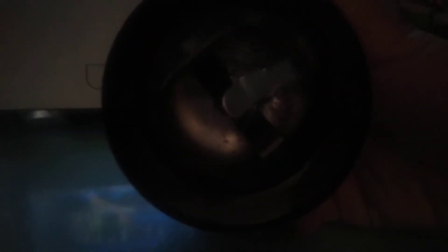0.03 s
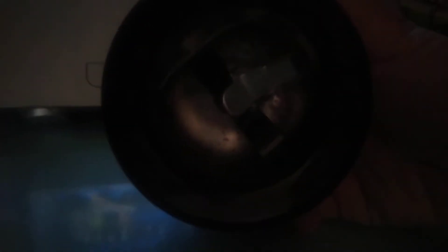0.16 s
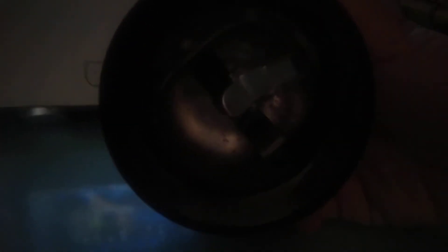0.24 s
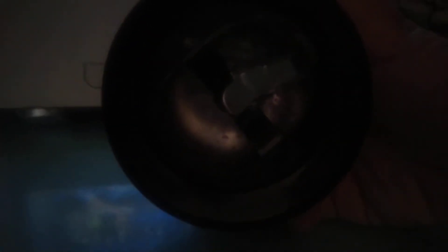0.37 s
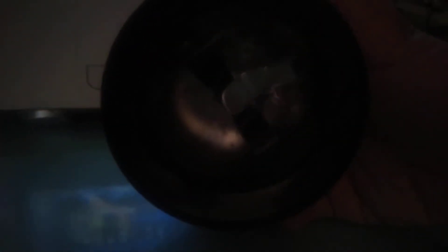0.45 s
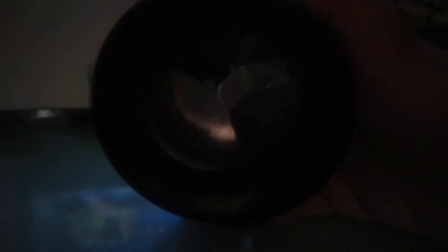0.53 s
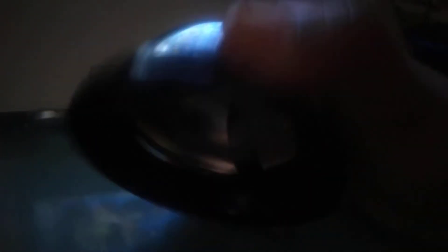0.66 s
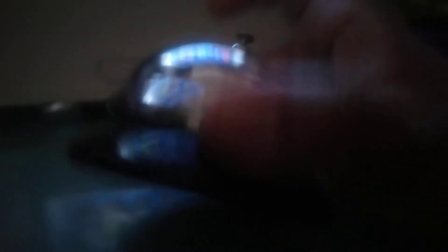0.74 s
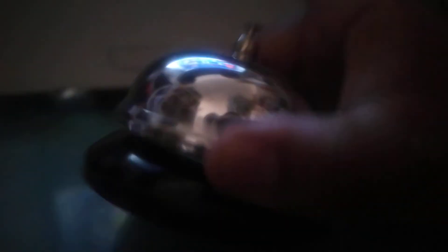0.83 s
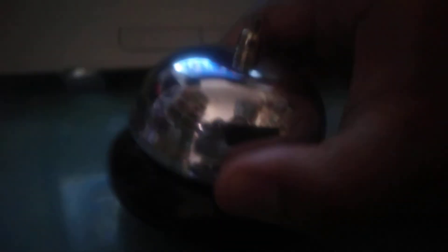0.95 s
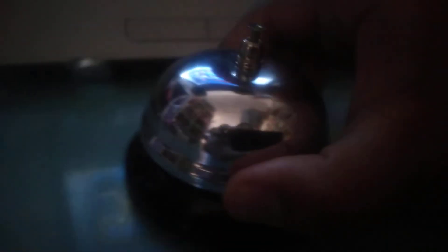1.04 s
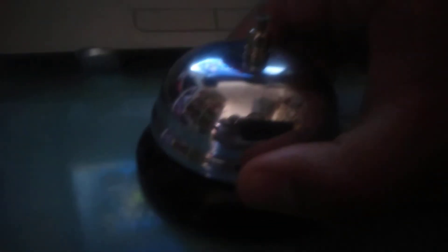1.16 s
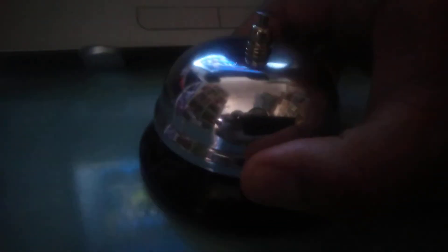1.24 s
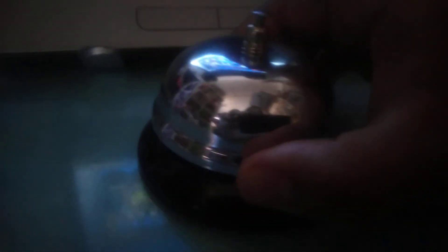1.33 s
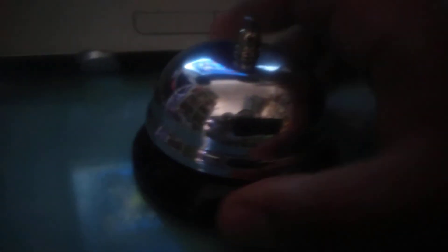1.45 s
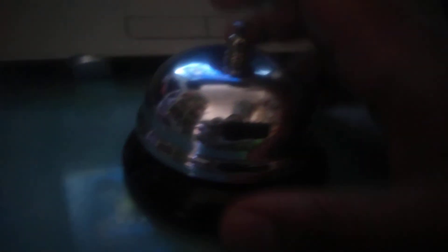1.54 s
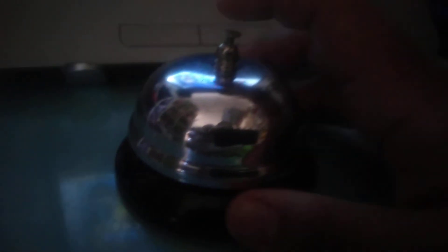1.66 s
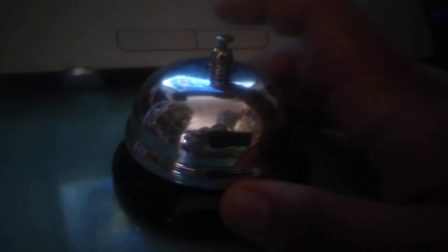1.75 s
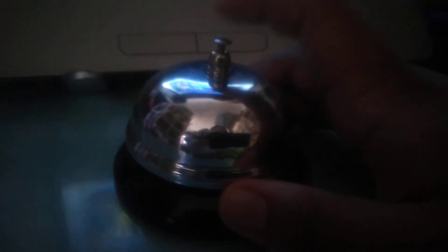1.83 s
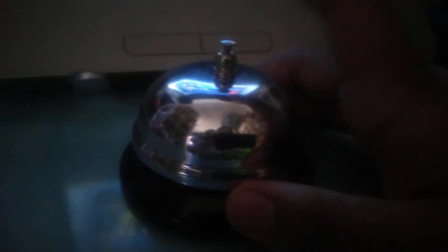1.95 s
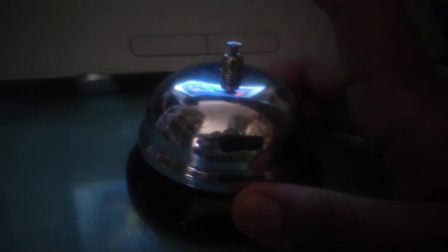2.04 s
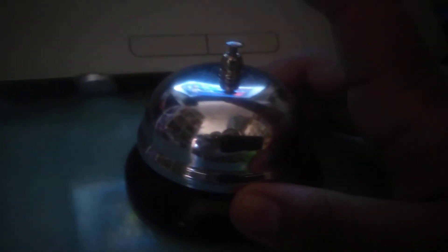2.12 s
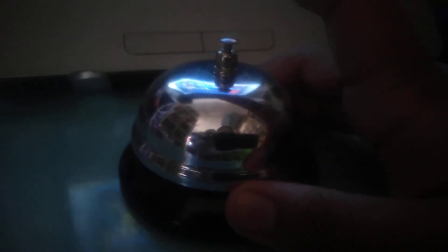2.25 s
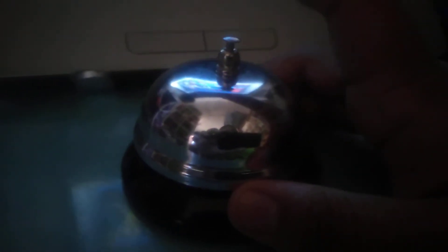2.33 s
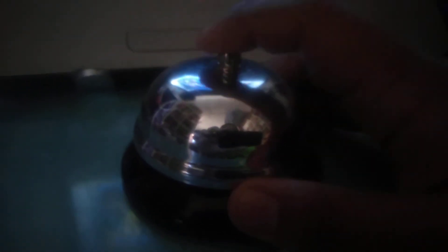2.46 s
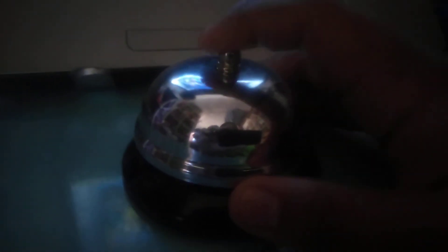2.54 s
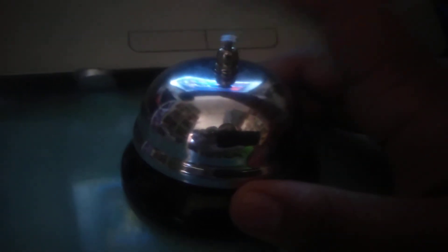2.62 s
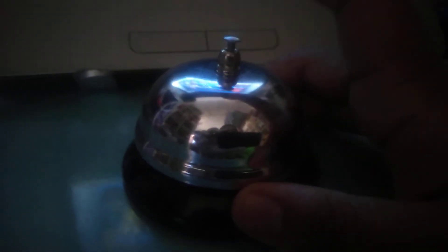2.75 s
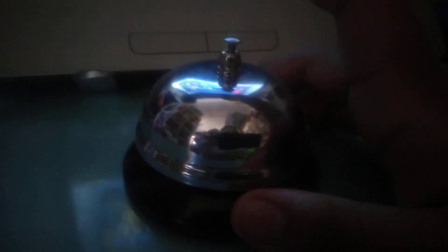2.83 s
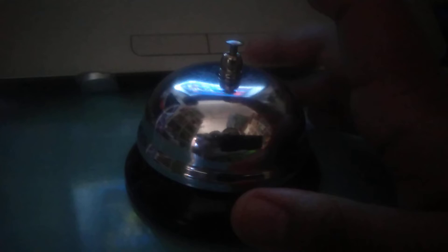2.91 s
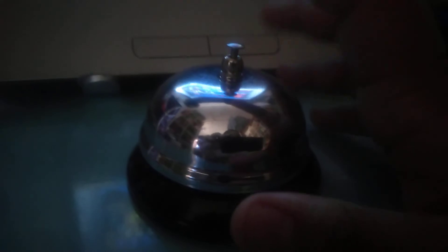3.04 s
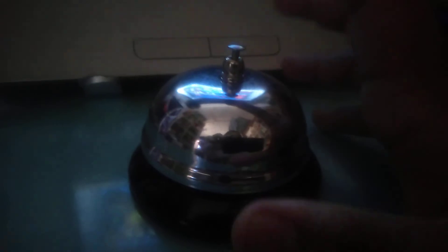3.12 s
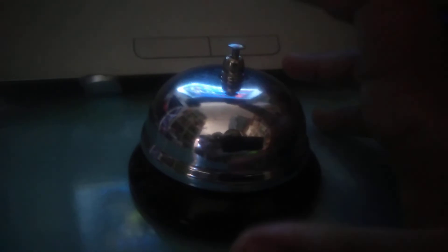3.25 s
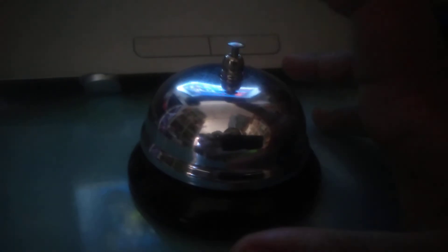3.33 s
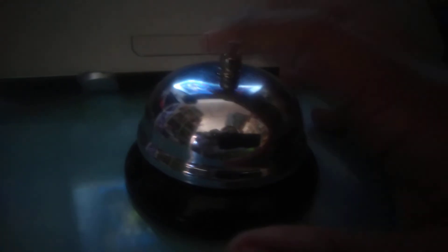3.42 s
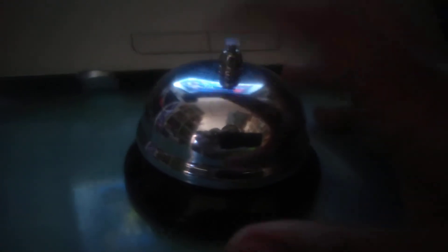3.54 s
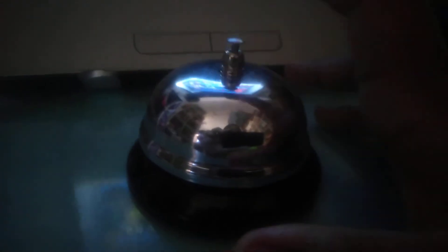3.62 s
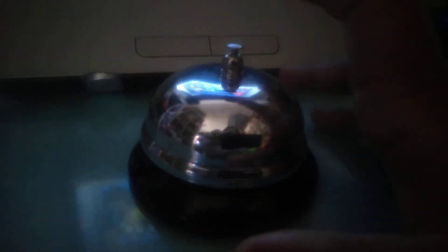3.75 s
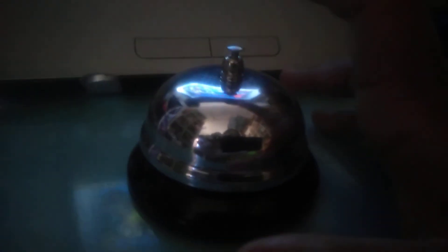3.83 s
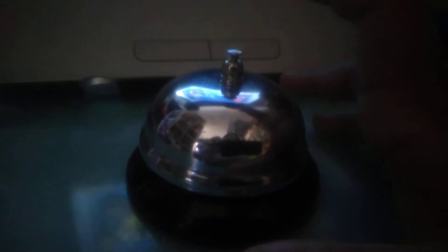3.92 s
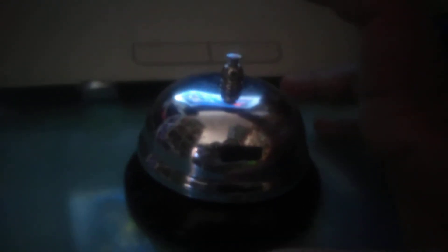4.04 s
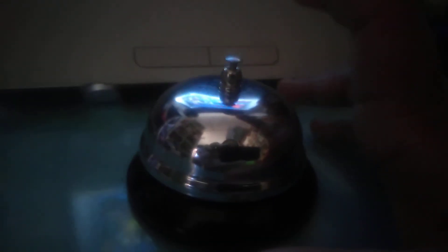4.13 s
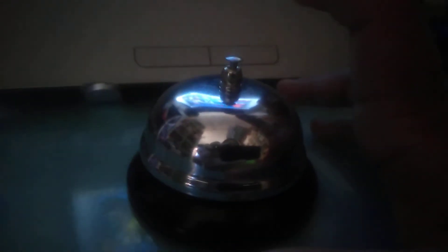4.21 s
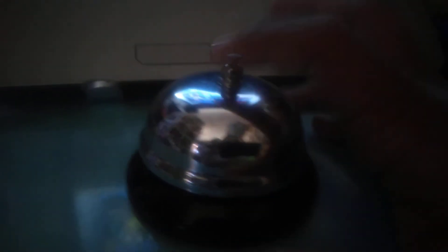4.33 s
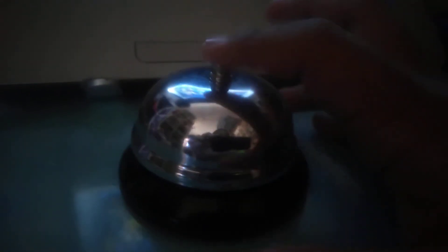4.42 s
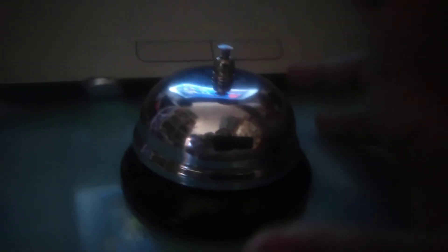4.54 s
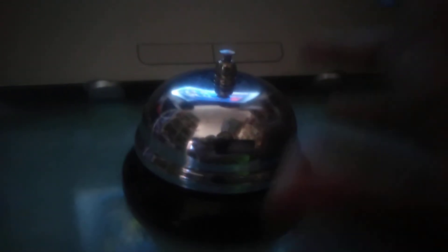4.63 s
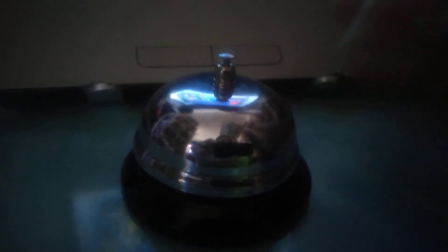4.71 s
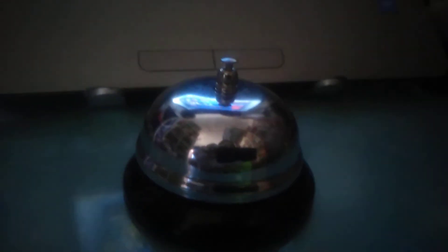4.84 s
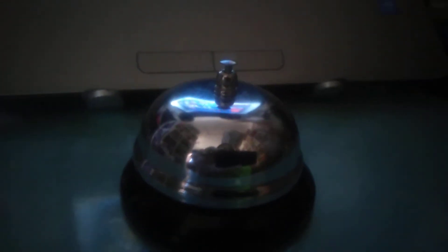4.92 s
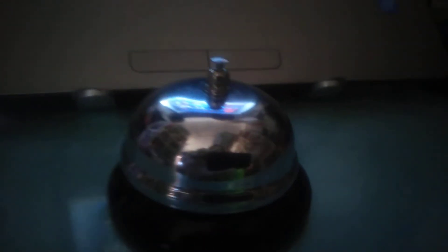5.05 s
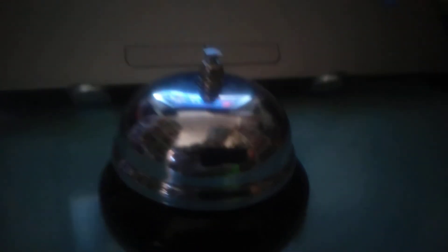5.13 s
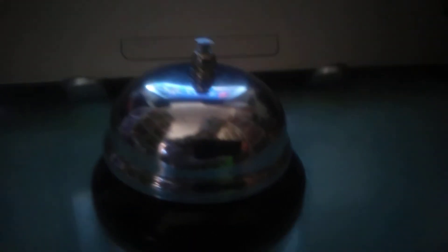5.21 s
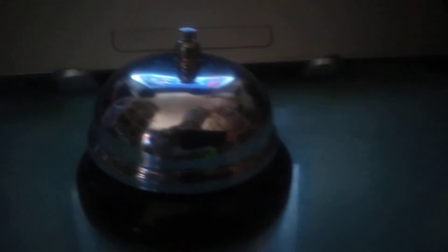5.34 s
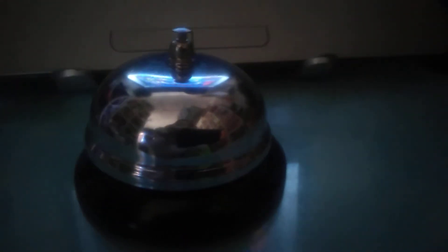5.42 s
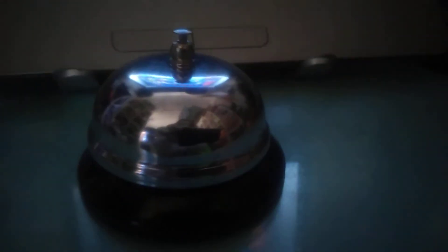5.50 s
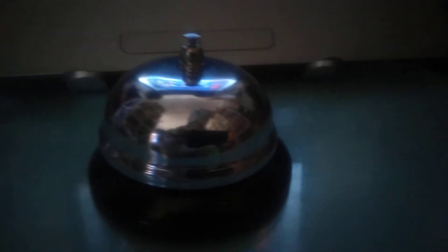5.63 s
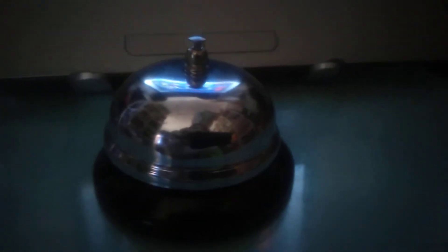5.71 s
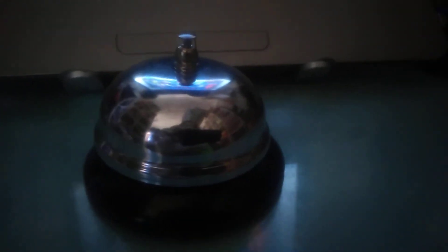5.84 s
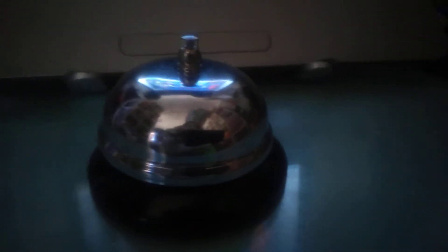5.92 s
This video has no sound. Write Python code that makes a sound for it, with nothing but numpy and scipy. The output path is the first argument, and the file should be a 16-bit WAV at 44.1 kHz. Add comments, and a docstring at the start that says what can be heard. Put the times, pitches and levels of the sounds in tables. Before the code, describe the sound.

Loose metal rattles and a soft knock on a table, then a muted bell clink and two bright, ringing counter-bell dings.

```python
"""A table top beside a humming computer: a steel desk bell is turned over in the hand, rattling, and set down.
It is struck three times: once choked by the finger, then twice ringing freely with slow beats.
The dome is a sum of paired decaying sines; rattles, clicks, knocks and thumps are noise cracks plus short modes.
Hum and fan are steady tones, rumble and hiss are shaped noise.
The close camera turns its gain down at loud peaks and lets it swell back."""
import sys
import numpy as np
from scipy import signal
from scipy.fft import rfft, irfft, next_fast_len
from scipy.io import wavfile
from scipy.ndimage import map_coordinates

SR = 44100
rng = np.random.default_rng(int(sys.argv[2]) if len(sys.argv) > 2 else 0)


def dump(signal):
    """Clip the signal to [-1, 1] and save it as 16-bit WAV at the path in sys.argv[1]."""
    limited = np.clip(np.atleast_2d(signal).T, -1, 1)
    pcm = np.round(limited * 32767).astype(np.int16)
    wavfile.write(sys.argv[1], SR, pcm)


N = 263277


def amp(db):
    """Decibels to gain."""
    return 10 ** (np.asarray(db) / 20)


def unit(x):
    """Scaled to rms 1."""
    return x / np.sqrt(np.mean(x ** 2) + 1e-20)


def wobble(rate_hz):
    """Smooth random curve, rate_hz knots a second."""
    knots = rng.standard_normal(int(N * rate_hz / SR) + 4)
    return map_coordinates(knots, [np.arange(N) * rate_hz / SR])


def filtered(x, gain):
    """x times a gain that depends on frequency."""
    size = next_fast_len(len(x) + 8192)
    return irfft(rfft(x, size) * gain(np.fft.rfftfreq(size, 1 / SR)), size)[:len(x)]


def noise(spectrum, size):
    """Noise of rms 1 coloured by (pitch_hz, level_db) points."""
    hz, db = np.transpose(spectrum)
    colour = lambda f: amp(np.interp(np.log(f + 1), np.log(hz), db))
    return unit(filtered(rng.standard_normal(size), colour))


def add(track, start_s, sound):
    """Mix a sound into the track at start_s."""
    start = round(start_s * SR)
    track[start:start + len(sound)] += sound[:N - start]


# mains hum: time_s, level_db
HUM = [(0.1, -62), (2.18, -46), (2.72, -66), (4.75, -67), (5.9, -66.5)]
# computer fan tones, relative: pitch_hz, level_db
FAN_TONES = [(102.3, -71.5), (177.6, -69.5), (204.6, -66), (231.5, -64), (376.8, -67), (538.3, -72)]
# hiss spectrum, relative: pitch_hz, density_db_per_hz
HISS_SPECTRUM = [(40, -21), (150, -26), (300, -26.5), (400, -24.5), (600, -29.5), (1130, -28), (1500, -32),
                 (3000, -37.5), (5300, -43.5), (6600, -36), (8500, -49.5), (12000, -50), (15700, -38)]
# level at the mean hum; share of the hum's dB swell followed
FAN_DB, FAN_FOLLOWS = -63.5, 0.21
HISS_DB, HISS_FOLLOWS = -57, 0.052


def background(mains_hz=51, rumble_db=-53):
    """Hum sine, wavering fan sines, low rumble noise and hiss; fan and hiss swell with the hum."""
    t = np.arange(N) / SR
    hum_s, hum_points_db = np.transpose(HUM)
    hum_db = np.interp(t, hum_s, hum_points_db)
    swell_db = hum_db - hum_db.mean()
    hum = amp(hum_db) * unit(np.sin(2 * np.pi * mains_hz * t))
    fan = unit(sum(amp(db + 2.9 * wobble(5.13)) * np.sin(2 * np.pi * hz * t + 0.7 * wobble(9))
                   for hz, db in FAN_TONES))
    fan *= amp(FAN_DB + FAN_FOLLOWS * swell_db)
    hiss = amp(HISS_DB + HISS_FOLLOWS * swell_db) * noise(HISS_SPECTRUM, N)
    rumble_band = [(8, -16.0), (21, -6), (25, 5.0), (30, -21), (65, -12.5), (90, -42.5), (200, -69.0)]
    return hum + fan + hiss + amp(rumble_db) * noise(rumble_band, N)


def contact(modes, spectrum, tilt_db_per_oct, ring_db, ring_life, crack_t60_s, echo_db, echo_t60_s,
            rise_s=0.00038):
    """One hit: short crack, body modes at chance strengths, scatter from nearby surfaces; first 4 ms at rms 1."""
    t = np.arange(SR // 4) / SR
    head = slice(SR // 250)
    tilt_db = lambda hz: tilt_db_per_oct * np.log2(hz / 1000)
    ring = np.zeros(len(t))
    for hz, width_hz, db in modes:
        strength = width_hz * amp(db + tilt_db(hz) + rng.normal(0, 0.52))
        decay = np.exp(-np.pi * width_hz * t / ring_life)
        ring += strength * decay * np.sin(2 * np.pi * (hz * t + rng.random()))
    fade = amp(-60 * t / crack_t60_s) + amp(echo_db - 60 * t / echo_t60_s)
    crack = fade * noise([(hz, db + tilt_db(hz)) for hz, db in spectrum], len(t))
    hit = crack / np.std(crack[head]) + amp(ring_db) * ring / np.std(ring[head])
    hit *= 1 - np.exp(-t / rise_s)
    return hit / np.std(hit[head])


# clapper flops while the bell is turned over: start_s, level_db, tilt_db_per_oct, rattle_s
RATTLES = [(0.0248, -44.5, 2, .009), (0.0837, -35.5, 0.5, .003), (0.2111, -29.5, -2, .009),
           (0.3929, -28, 2.5, .003), (.732, -40.5, -5, .003), (0.7369, -32, -4, .021)]


def pivot(peak_s=0.0042, lead_s=0.026, squeak_db=-29):
    """Clapper's pivot squeaks just before each flop: a brief swell of narrow-band noise."""
    out, t = np.zeros(N), np.arange(SR // 10) / SR
    band = [(7000, -31), (8050, -7), (8300, 5), (8550, -25), (9800, -40)]
    swell = t / peak_s * np.exp(1 - t / peak_s)
    for start_s, db, *_ in RATTLES:
        add(out, max(start_s - lead_s, 0), amp(db + squeak_db) * noise(band, len(t)) * swell)
    return out


# clapper's frame modes, relative: pitch_hz, width_hz, level_db
FRAME_MODES = [(2050, 850, -16.5), (2697, 40, -9), (3614, 130, -9), (4030, 180, -13), (4850, 64, -12.5),
               (6230, 56, -6), (6520, 49, 2.5), (7140, 41, 2), (8190, 95, 5.5), (9460, 110, -2.5),
               (9760, 35, -4), (10900, 32, -8), (11600, 60, -10), (13340, 110, -7), (13860, 65, 6),
               (14600, 190, 1)]
# frame crack, relative: pitch_hz, density_db_per_hz
FRAME_CRACK = [(530, -29), (900, -15), (1590, -14), (3150, -9), (3590, 3), (5480, -8), (7140, 7),
               (11800, -3), (16000, 6)]


def flop(db, tilt_db_per_oct):
    """Clapper hits its frame: bright crack and frame modes."""
    return amp(db) * contact(FRAME_MODES, FRAME_CRACK, tilt_db_per_oct, ring_db=5.5, ring_life=1.64,
                             crack_t60_s=.019, echo_db=-8, echo_t60_s=.14)


# bell base modes, relative: pitch_hz, width_hz, level_db
BASE_MODES = [(1460, 170, 0), (2000, 32, -1), (2780, 110, -6), (3730, 28, -4), (4400, 70, -5),
              (5720, 24, 1), (6450, 30, 0), (7890, 29, -11), (10100, 31, -17)]
# base crack, relative: pitch_hz, density_db_per_hz
BASE_CRACK = [(700, -13.5), (1400, -1.5), (2800, -4), (3400, -12), (4400, -9), (7000, -13), (9000, -26),
              (13000, -34)]


def knock(db):
    """Base hits the table: short crack and base modes."""
    return amp(db) * contact(BASE_MODES, BASE_CRACK, 0, ring_db=1, ring_life=1.6,
                             crack_t60_s=.012, echo_db=-14, echo_t60_s=.15)


# base set down on the table: start_s, level_db
KNOCKS = [(0.735, -47), (0.755, -40.5), (1.1075, -35), (1.167, -52)]
BOUNCE_S, RATTLE_LOSS_DB = 0.0051, 8.5  # contact spacing; loss over a rattle's length
ROCK_S, ROCK_LOSS_DB = 0.017, 9.5  # rim rocking: contact spacing; loss per contact


def turning_over(rock_count=4):
    """Loose clapper bounces on its frame; the base lands and rocks to rest in weakening contacts."""
    out = np.zeros(N)
    for start_s, db, tilt_db_per_oct, rattle_s in RATTLES:
        for delay_s in np.arange(0, rattle_s, BOUNCE_S):
            bounce_db = db - RATTLE_LOSS_DB * delay_s / rattle_s
            add(out, start_s + delay_s, flop(bounce_db, tilt_db_per_oct))
    for start_s, db in KNOCKS:
        for k in range(rock_count):
            add(out, start_s + k * ROCK_S, knock(db - k * ROCK_LOSS_DB))
    return out


# table top modes, relative: pitch_hz, width_hz, level_db
TABLE_MODES = [(218, 46, -12.5), (831, 35, -1.5), (1300, 47, -16), (1650, 40, -13.5), (1790, 29, -14),
               (2100, 36, -9)]
# table thud, relative: pitch_hz, density_db_per_hz
TABLE_THUD = [(40, -23), (100, 0), (300, -4.5), (800, 1), (1500, -13), (2500, -18), (5000, -45)]


def thump(db, ring_db):
    """Table takes the finger's push: dull thud and low table modes."""
    return amp(db) * contact(TABLE_MODES, TABLE_THUD, 0, ring_db=ring_db, ring_life=1.0,
                             crack_t60_s=0.037, echo_db=-25, echo_t60_s=0.069)


# plunger and guide modes, relative: pitch_hz, width_hz, level_db
PLUNGER_MODES = [(3720, 28, -6.5), (4810, 105, 1), (6080, 57, -19), (6390, 200, -4.5), (6930, 32, 4),
                 (8200, 35, 0), (9830, 62, -11.5), (11400, 55, -12), (13830, 65, 1.5), (16400, 120, -17)]
# plunger crack, relative: pitch_hz, density_db_per_hz
PLUNGER_CRACK = [(530, -46), (900, -9), (1410, -1), (2220, -20.5), (3470, -6.5), (4050, -16.5), (4860, -7),
                 (12000, -14), (16000, -7)]


def click(db, tilt_db_per_oct):
    """Plunger hits its guide: crack and plunger modes."""
    return amp(db) * contact(PLUNGER_MODES, PLUNGER_CRACK, tilt_db_per_oct, ring_db=0, ring_life=1.5,
                             crack_t60_s=.02, echo_db=0, echo_t60_s=.13, rise_s=.00055)


# plunger springs back to its stop: stop_s, click_db, tilt_db_per_oct, base_knock_db, travel_s
RETURNS = [(2.7025, -35, 1, -65, 0.081), (3.654, -35.5, 13, -46, 0.056), (4.579, -42, -4, -49, 0.075)]
SEAT_LEAD_S = .027  # clapper seats this long before the stop


def returns(unstick_db=-8, seat_db=-4, seat_knock_db=-1.5):
    """Let go, the plunger comes unstuck, the clapper seats and the plunger meets its stop."""
    out = np.zeros(N)
    for stop_s, db, tilt_db_per_oct, knock_db, travel_s in RETURNS:
        add(out, stop_s - travel_s, click(db + unstick_db, tilt_db_per_oct))
        seat = click(db + seat_db, tilt_db_per_oct=-2.5) + knock(knock_db + seat_knock_db)
        add(out, stop_s - SEAT_LEAD_S, seat)
        add(out, stop_s, click(db, tilt_db_per_oct) + knock(knock_db))
    return out


# plunger presses: blow_s, choked (by the finger), travel_s (before the blow), touch_db, blow_click_db,
# base_knock_db, bottom_thump_db, table_ring_db (relative to the thud)
STRIKES = [(2.506, True, 0.027, -36.5, -19.5, -49, -65, -6),
           (3.4938, False, .021, -37, -25, -26, -29.5, -18), (4.4151, False, .022, -31, -44, -27, -21.5, 4)]
# share of the travel still to go, level
BASE_TIP_SHARE, BASE_TIP_DB = 0.57, -41.5
LEVER_CATCH_SHARE, LEVER_CATCH_DB = .26, -26.5
BOTTOM_S, FALL_BACK_S = 0.0079, 0.043  # after the blow: push bottoms out; clapper falls back


def presses(table_db=-2, chatter_db=-29, chatter_gap_s=0.012, chatter_loss_db=1.5, chatter_count=4):
    """Each press: touch, base tips, lever catches, blow, bottom, clapper falls back."""
    out = np.zeros(N)
    for blow_s, choked, travel_s, touch_db, blow_db, knock_db, thump_db, ring_db in STRIKES:
        add(out, blow_s - travel_s, click(touch_db, tilt_db_per_oct=3.5))
        add(out, blow_s - travel_s * BASE_TIP_SHARE, knock(min(BASE_TIP_DB, knock_db)))
        add(out, blow_s - travel_s * LEVER_CATCH_SHARE, click(LEVER_CATCH_DB, tilt_db_per_oct=0.5))
        blow = click(blow_db, tilt_db_per_oct=0.0) + knock(knock_db)
        add(out, blow_s, blow + thump(knock_db + table_db, ring_db=-3.5))
        add(out, blow_s + BOTTOM_S, thump(thump_db, ring_db))
        add(out, blow_s + FALL_BACK_S, click(db=-29, tilt_db_per_oct=1.5))
        if choked:  # clapper chatters against the dome, base rocks back
            add(out, blow_s + FALL_BACK_S, knock(db=-36.5))
            for k in range(1, chatter_count + 1):
                chatter = click(chatter_db - k * chatter_loss_db, tilt_db_per_oct=6.0)
                add(out, blow_s + k * chatter_gap_s, chatter)
    return out


def clapper(db=-33, t60_s=0.82, hold_s=0.05):
    """Held against the dome on the choked blow, the clapper sings one tone until it drops away."""
    out, t = np.zeros(N), np.arange(SR // 2) / SR
    release = np.exp(-np.maximum(t - hold_s, 0) / .005)
    add(out, STRIKES[0][0], release * np.sin(2 * np.pi * 9312 * t) * amp(db - 60 * t / t60_s))
    return out


# mode strengths, one row per blow, set by where the clapper lands: mode1_db ... mode6_db
STRENGTH = [(-30, -26, -24, -21.5, -16, -15), (-31.5, -26, -26.5, -12.5, -15.5, -17.5),
            (-29.5, -27, -20.5, -9, -19, -15.5)]


def sizzle(db=-4, t60_s=0.28, choke_t60_s=0.054):
    """Crowded top modes flash as noise at each blow; a resting finger stops them as the clapper falls back."""
    out, t = np.zeros(N), np.arange(SR // 2) / SR
    band = [(13500, -34.5), (14900, -40), (15370, 15), (15700, -8), (16000, -21.5)]
    for (blow_s, choked, *_), levels_db in zip(STRIKES, STRENGTH):
        damped = np.maximum(t - FALL_BACK_S, 0) / choke_t60_s if choked else 0
        fade = amp(levels_db[-1] + db - 60 * (t / t60_s + damped))
        add(out, blow_s, noise(band, len(t)) * fade)
    return out


# dome modes, each a close pair: pitch_hz, twin_offset_hz
DOME_PITCHES = [(1127.1, .5), (2870.2, 1.5), (5206.6, 17.1), (8097.6, -6.7), (11482, 8.4), (15365, 97)]
# how the pairs ring: t60_s, twin_t60_s, twin_share (signed), twin_change_db (over the camera's swing)
DOME_PAIRS = [(9.5, 9, 0, 0), (7, 7, 0, 0), (2.85, 3.05, -.57, -12), (1.03, 1.12, .21, 10),
              (.49, .53, -.35, 6), (.14, .12, .4, 0)]
# lobe edge crossed in each of the four low modes: bearing (0-1), change_db, twin_slip_cycles
LOBES = [(0.33, 4, 0), (.5, -0.06, 0), (0.77, 6, 0.032), (0.17, -6.5, 0.17)]
SWING_START_S, SWING_END_S = 4.586, 5.305  # camera swings round the dome, bearing 0 to 1
LOBE_EDGE, TWIN_BEARING = .15, 0.19  # edge width; bearing of the twins' edges


def dome(choke_t60_s=0.094):
    """Each blow restarts the pairs; the uneven dome makes them beat. A resting finger damps and flattens them."""
    out, now = np.zeros(N), np.arange(N) / SR
    bearing = (now - SWING_START_S) / (SWING_END_S - SWING_START_S)
    crossed = lambda edge: (1 + np.tanh((bearing - edge) / LOBE_EDGE)) / 2
    drifts = [(change_db * crossed(edge), slip * crossed(edge)) for edge, change_db, slip in LOBES]
    drifts += [(0.0051, 0)] * 2  # top two modes: constant
    ends_s = [row[0] for row in STRIKES[1:]] + [N / SR]
    for (blow_s, choked, *_), levels_db, end_s in zip(STRIKES, STRENGTH, ends_s):
        t = np.maximum(now - blow_s, 0)
        fade = lambda t60_s: amp(-60 * t / t60_s)
        ratio = .996 if choked else 1
        held = (fade(choke_t60_s) if choked else 1) * np.exp(-np.maximum(now - end_s, 0) / 0.0035)
        for pitch, pair, db, drift in zip(DOME_PITCHES, DOME_PAIRS, levels_db, drifts):
            hz, offset_hz = pitch
            t60_s, twin_t60_s, share, twin_change_db = pair
            drift_db, slip = drift
            main = fade(t60_s) * np.sin(2 * np.pi * hz * ratio * t)
            # twin radiates in other directions: beat depth follows the bearing
            twin_gain = share * amp(twin_change_db * crossed(TWIN_BEARING)) * fade(twin_t60_s)
            twin = twin_gain * np.sin(2 * np.pi * ((hz * ratio + offset_hz) * t + slip))
            out += held * amp(db + drift_db) * (main + twin)
    return out


def scene():
    """Everything as it reaches the microphone."""
    bell = dome() + clapper() + sizzle()
    handling = pivot() + turning_over() + presses() + returns()
    return (bell + handling + background())[None]


def gain_control(x, limit_db=-14.2, release_db_per_s=54, attack_s=.0007, leak=.0007):
    """Peaks over the limit pull the gain down within about a millisecond; it climbs back at a steady dB rate."""
    climb_db = release_db_per_s * np.arange(N) / SR
    over_db = np.maximum(20 * np.log10(np.abs(x) + 1e-9) - limit_db, 0)
    held_db = np.maximum.accumulate(over_db + climb_db) - climb_db
    keep = np.exp(-1 / (attack_s * SR))
    cut_db = signal.lfilter([1 - keep], [1, -keep], held_db)
    # control voltage leaks in as a soft thump
    return x * amp(-cut_db) + leak * cut_db


def record(dry, ceiling=0.26, top_hz=15850):
    """Gain control, soft clipping of what slips past it, and the band limit."""
    x = gain_control(dry[0])
    x = x / (1 + (x / ceiling) ** 4) ** (1 / 4)
    return filtered(x, lambda hz: 1 / (1 + (hz / top_hz) ** 160))[None]


dry = scene()
out = record(dry)
dump(out)
```